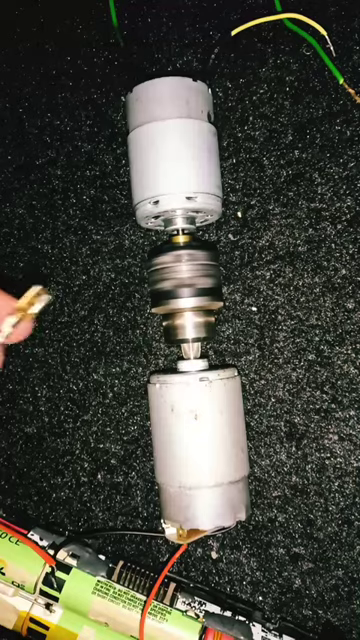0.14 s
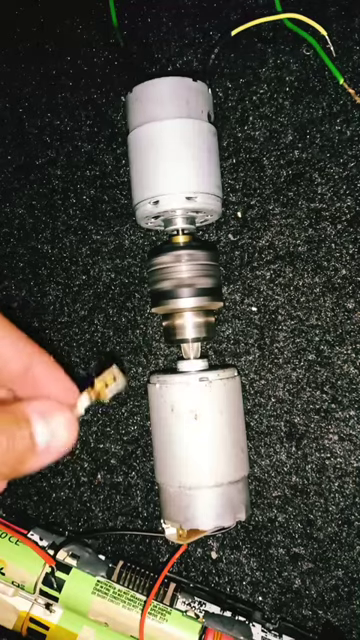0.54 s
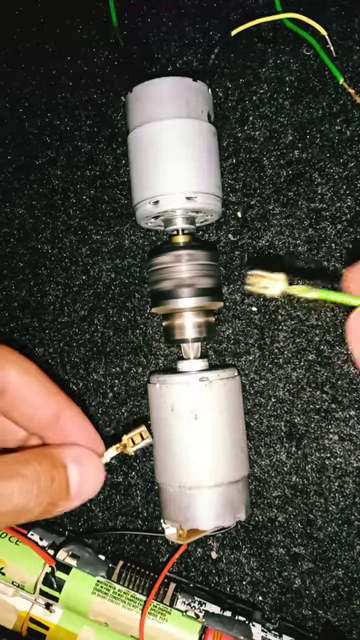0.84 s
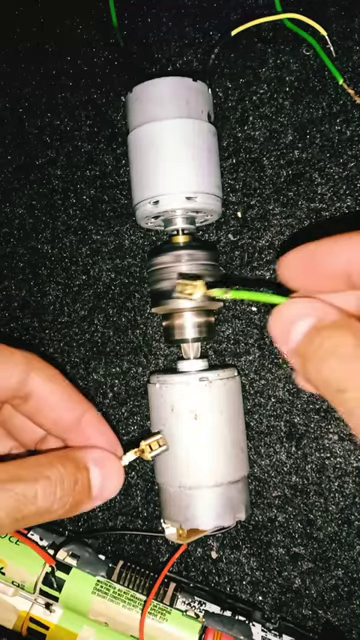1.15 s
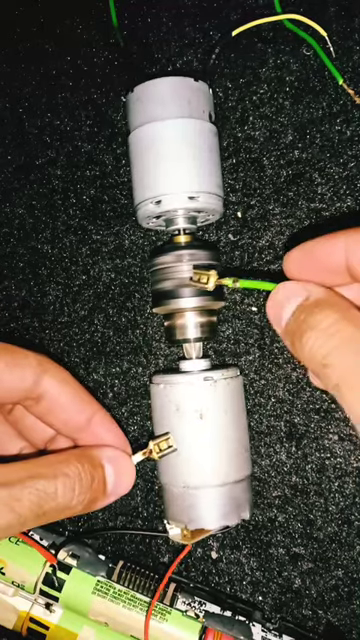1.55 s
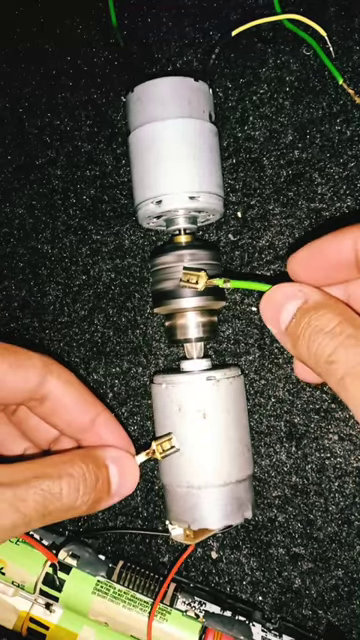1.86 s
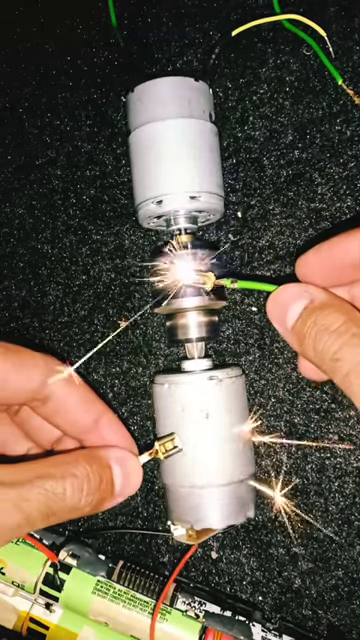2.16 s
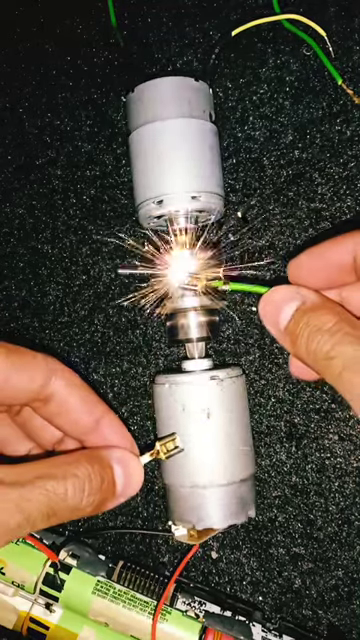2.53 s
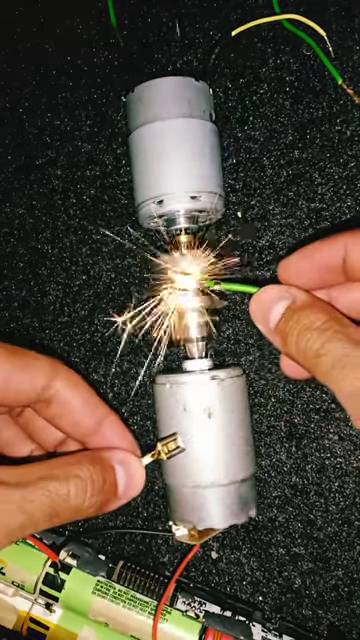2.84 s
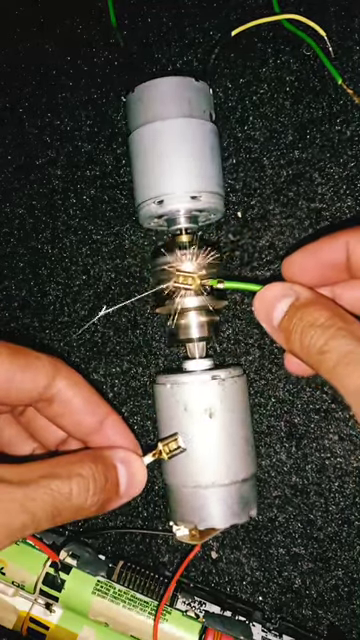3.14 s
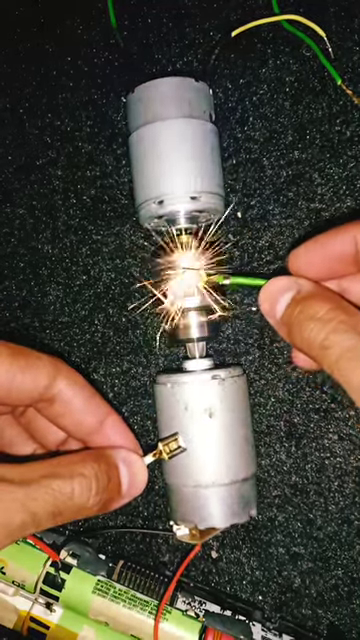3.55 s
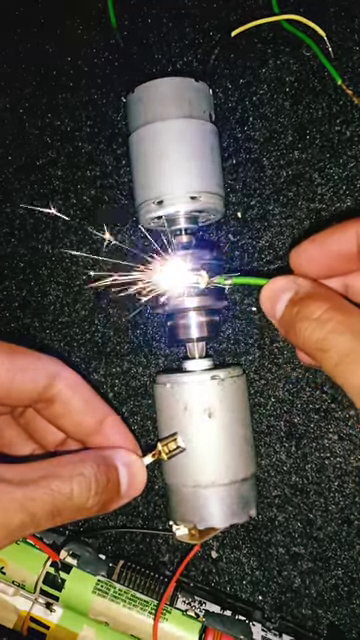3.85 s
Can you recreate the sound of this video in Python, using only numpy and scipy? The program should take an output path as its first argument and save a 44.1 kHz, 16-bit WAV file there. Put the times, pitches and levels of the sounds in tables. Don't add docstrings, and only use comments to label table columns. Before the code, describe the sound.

Electric sparking snaps and sizzles in rough buzzing bursts after quiet hiss and small handling knocks

```python
import sys
import numpy as np
from scipy import signal
from scipy.fft import rfft, irfft
from scipy.io import wavfile
from scipy.ndimage import uniform_filter1d

SR = 44100
rng = np.random.default_rng(int(sys.argv[2]) if len(sys.argv) > 2 else 0)


def file_out(sig):
    cols = np.atleast_2d(sig).T
    lim = np.clip(cols, -1, 1)
    pcm = np.round(lim * 32767).astype(np.int16)
    wavfile.write(sys.argv[1], SR, pcm)


def gain_from_db(level_db):
    decades = np.asarray(level_db, float) / 20
    return 10 ** decades


N = 176400
T = np.arange(N) / SR


def evened(x):
    return x / np.sqrt(np.mean(x ** 2) + 1e-20)


def curve(table, column):
    rows = np.array(table)
    return np.interp(T, rows[:, 0], rows[:, column])


def mode(x, hz, width):
    return signal.lfilter(*signal.iirpeak(min(hz, SR / 2.2), hz / width, SR), x)


def double_mode(x, hz, width):
    return mode(mode(x, hz, width), hz, width)


def glide(x, hz, width):
    turn = np.exp(2j * np.pi * np.cumsum(hz) / SR)
    r = np.exp(-np.pi * width / SR)
    return 2 * (turn * signal.lfilter([(1 - r) ** 2], [1, -2 * r, r * r], x / turn)).real


def clicks(per_s, spread_db):
    sizes = gain_from_db(spread_db * np.minimum(rng.exponential(1, N), 3))
    return (rng.random(N) < per_s / SR) * sizes


def wobble(size):
    return evened(uniform_filter1d(uniform_filter1d(rng.standard_normal(N), size), size))


# t/s, brush tick rate/Hz, level/dB
MOTOR = [(.1, 117, -67), (.5, 108, -64), (.75, 119, -67), (1.0, 111, -68.5), (1.5, 122.8, -68.5),
         (2.1, 119, -71.5), (4, 190, -74)]
# f/Hz, level/dB
HISS_SPECTRUM = [(30, -6), (90, 3.5), (300, 0.5), (1200, -5), (3300, -3), (4400, -11), (6200, -28),
                 (7900, -16), (11000, -27.5), (13600, -23.5), (15500, -48)]
# f/Hz, width/Hz, level/dB at the whine's peak, slope/(dB/s) away from it
BRUSH_RING = [(12800, 300, -86, -1), (13500, 400, -89, -2), (4900, 250, -91, 2)]
TICK_LEVELS = [0, -1, -3, -6, -4]
# order, level/dB
TICK_ORDERS = [(1, -77), (2, -76)]
# t/s, f/Hz, level/dB
BRUSH_WHINE = [(.1, 5140, -84), (.26, 5300, -79), (.4, 5320, -87), (.68, 5300, -73.5), (.8, 5280, -76),
               (.92, 5300, -91), (1.2, 5300, -100)]


def idle():
    hz = np.fft.rfftfreq(N, 1 / SR)
    f, db = np.transpose(HISS_SPECTRUM)
    colour = gain_from_db(np.interp(np.log(hz + 1), np.log(f), db))
    hiss = irfft(rfft(rng.standard_normal(N)) * colour, N)
    hiss /= np.std(mode(hiss, 1520, 6000))
    hiss_db = curve(MOTOR, column=2) + wobble(size=2000)

    turns = np.cumsum(curve(MOTOR, column=1)) / SR
    decay = np.exp(-(turns % 1) / 0.059)
    strength = gain_from_db(TICK_LEVELS)[turns.astype(int) % len(TICK_LEVELS)]
    ticks = decay * strength * rng.standard_normal(N)

    away_s = abs(T - .68)
    brushes = sum(evened(double_mode(ticks, f, width)) * gain_from_db(db + slope * away_s)
                  for f, width, db, slope in BRUSH_RING)
    whine = evened(glide(ticks, curve(BRUSH_WHINE, column=1), 120)) * gain_from_db(curve(BRUSH_WHINE, column=2))
    orders = sum(gain_from_db(db) * np.sin(2 * np.pi * k * turns) for k, db in TICK_ORDERS)
    return hiss * gain_from_db(hiss_db) + brushes + whine + orders


# t/s, level/dB
HUM_SWELL = [(.1, -65.5), (.4, -73), (.6, -50), (.68, -46), (.84, -46.5), (.97, -59.5), (1.09, -48.5),
             (1.23, -48.5), (1.48, -77.5), (1.58, -55), (1.74, -58.5), (1.84, -64), (1.94, -56.5),
             (2.33, -60.5), (2.6, -51.5), (2.8, -81), (3.08, -61), (4, -73)]


def hum():
    tone = np.sqrt(2) * np.sin(2 * np.pi * 59 * T)
    fuzz = evened(mode(mode(rng.standard_normal(N), 67, 110), 48, 130))
    return gain_from_db(curve(HUM_SWELL, column=1)) * (tone + gain_from_db(-15) * fuzz)


# t/s, length/s, level/dB, f/Hz
HANDLING_KNOCKS = [
    (.318, .011, -43, 3150),
    (.3175, .004, -45, 1300),
    (.342, .004, -47, 2800),
    (.343, .004, -47, 1600),
    (.379, .005, -36, 1550),
    (.379, .003, -49, 4300),
    (.322, .003, -59, 7000),
    (.38, .004, -59, 7900),
    (1.262, .008, -60, 1500),
    (2.1, .008, -62, 1500),
]
# t/s, length/s, level/dB
SLEEVE_RUSTLES = [
    (0.218, 0.33, -58),
    (0.6, 0.14, -57.5),
]
# f/Hz, width/Hz, level/dB
CLOTH_RING = [(1140, 580, -2), (1630, 220, 3.5), (2140, 180, -3), (2830, 260, -5.5), (3850, 180, -2),
              (2380, 1700, -10), (7450, 2700, -20.5)]
# t/s, pitch ratio
CLOTH_BEND = [(.18, 0.82), (.28, 0.98), (.4, 1.13), (.52, 0.915), (.62, .96), (.68, 0.97), (.75, 1)]


def handling():
    knock_noise, cloth_noise = rng.standard_normal((2, N))
    knocks = 0
    for s, length, db, hz in HANDLING_KNOCKS:
        burst = knock_noise * (T > s) * np.exp(-((T - s) / length) ** 2)
        knocks = knocks + gain_from_db(db) * 5 * double_mode(burst, hz, 0.35 * hz)
    arch = sum(gain_from_db(db) * np.sin(np.pi * np.clip((T - s) / length, 0, 1)) for s, length, db in SLEEVE_RUSTLES)
    bend = curve(CLOTH_BEND, column=1)
    cloth = evened(sum(gain_from_db(db) * glide(cloth_noise, hz * bend, width) for hz, width, db in CLOTH_RING))
    return knocks + arch * cloth


# f/Hz, width/Hz, level/dB
SPARK_MODES = [(1063, 2250, -6.5), (2350, 550, -3.5), (3260, 640, 4), (3960, 1950, -1.5), (4853, 590, -1.5),
               (7226, 850, -4.5), (9200, 2000, -16), (10320, 1600, -14), (11930, 2800, -5.5),
               (13330, 2360, 0)]


def click_shape():
    hz = abs(np.fft.fftfreq(4096, 1 / SR))
    power = sum(gain_from_db(2 * db) / (1 + (2 * (hz - f) / width) ** 2) ** 2 for f, width, db in SPARK_MODES)
    log_level = np.log(power * (hz / (hz + 300)) ** 3 + 1e-9) / 2
    spectrum = np.exp(np.conj(signal.hilbert(log_level)))
    shape = -np.fft.ifft(spectrum).real[:1024]
    return shape / abs(shape).max()


def spark_colour(drive):
    bench_t60_s, port_lag_s, port_hz, port_width_hz = 0.045, 0.0023, 7956, 870
    t = np.arange(2000) / SR
    scatter = rng.standard_normal(2000) * gain_from_db(-60 * t / bench_t60_s) * (t > 0)
    echo = signal.oaconvolve(drive, scatter / np.linalg.norm(scatter))[:len(drive)]
    blunt = uniform_filter1d(drive, size=3)
    late = np.roll(drive + echo / 2, int(port_lag_s * SR))
    port = double_mode(late, port_hz, port_width_hz)
    direct = signal.oaconvolve(blunt + gain_from_db(-10) * echo, click_shape())[:len(drive)]
    heard = direct + 20 * gain_from_db(-15.5) * port
    return heard - mode(heard, 6340, 160)


# t/s, small spark level/dB, scrape pressure level/dB
CHUCK_CONTACT = [(2.2, -55, -91), (2.24, -60, -79), (2.3, -31.5, -49.5), (2.44, -34, -50.5),
                 (2.47, -40.5, -55), (2.52, -41.5, -58), (2.57, -37, -44), (2.69, -35.5, -44.5),
                 (2.79, -36.5, -41.5), (2.82, -34, -44.5), (2.88, -39, -49.5), (2.94, -44, -42.5),
                 (2.97, -38.5, -43.5), (3.2, -39, -42), (3.3, -38, -44), (3.57, -35, -43),
                 (3.65, -31, -42.5), (3.7, -36, -42.5), (4, -23.5, -43)]


def small_sparks():
    break_hz, window, clicks_per_s, stray = 100.1, .19, 1500, 0.025
    breaks = break_hz * T + .02
    size = gain_from_db(2 * rng.standard_normal(500))[breaks.astype(int)]
    gate = np.exp(-((breaks % 1 - window) / (0.69 * window)) ** 2) * size
    per_s = clicks_per_s * (stray + np.minimum(gate, 2)) / 2
    sharp = clicks(per_s, 1.5)
    dull = uniform_filter1d(clicks(per_s, 1.5), size=3)
    sizzle = gain_from_db(-5) * (0.86 + gate) * rng.standard_normal(N)
    drive = evened(sharp + 2 * dull) + sizzle
    level_db = curve(CHUCK_CONTACT, column=1) - 7
    return evened(spark_colour(drive)) * gain_from_db(level_db) * (T > CHUCK_CONTACT[0][0])


# f/Hz, width/Hz, level/dB
CHUCK_RING = [(801, 530, 6.5), (717, 114, 1.5), (865, 81, 2), (949, 172, 3.5), (1101, 280, 2),
              (2158, 360, 3.5), (1500, 790, -9), (2760, 190, -40)]
# t/s, pitch ratio
CHUCK_DRIFT = [(2.2, 1.106), (2.9, 1.03), (3.13, 1.08), (3.4, 1.07), (3.7, 1.1), (4, 1.16)]


def scrape():
    slips = clicks(2500, 2.76) * rng.standard_normal(N)
    drift = curve(CHUCK_DRIFT, column=1)
    body = 0
    for hz, width, db in CHUCK_RING:
        pitch = hz * drift ** (hz < 1300)
        body = body + gain_from_db(db) * glide(slips, pitch, width)
    body = evened(signal.sosfilt(signal.butter(6, 520, "high", fs=SR, output="sos"), body))
    squeal = evened(double_mode(slips, 9940, 300)) * (T < 2.86)
    level_db = curve(CHUCK_CONTACT, column=2) + 0.5
    return (body + gain_from_db(-16) * squeal) * gain_from_db(level_db) * (T > CHUCK_CONTACT[0][0])


# t/s, peak level/dB
STRONG_SPARKS = [(2.2194, -19.5), (2.2283, -16), (2.2502, -21.5), (2.2588, -22), (2.2783, -21), (2.287, -23),
                 (2.3008, -22), (2.3081, -13.5), (2.3193, -36), (2.3277, -20), (2.3371, -24), (2.3404, -23),
                 (2.3502, -24), (2.3585, -16), (2.3684, -31), (2.3782, -29), (2.388, -21), (2.3972, -27),
                 (2.4105, -17), (2.4301, -23), (2.4367, -32), (2.4406, -23), (2.4466, -22.5), (2.4798, -26),
                 (2.4878, -21.5), (2.5005, -24.5), (2.5371, -20.5), (2.54, -26), (2.5601, -14.5),
                 (2.5682, -14.5), (2.5804, -20), (2.589, -23), (2.599, -21), (2.6082, -26), (2.6192, -19),
                 (2.6276, -21), (2.6389, -17.5), (2.6497, -24), (2.6596, -17.5), (2.6684, -22),
                 (2.678, -20.5), (2.686, -20.5), (2.6993, -22.5), (2.7059, -10.5), (2.7098, -20),
                 (2.7508, -25), (2.7604, -21), (2.8052, -15), (2.8089, -16), (2.8294, -12.5), (2.8488, -23),
                 (2.8596, -19), (2.8879, -31), (2.8968, -21), (2.9169, -16.5), (2.921, -34), (2.9276, -31),
                 (2.9302, -15),
                 (2.9792, -26), (2.9862, -31), (3.0191, -33), (3.0292, -23.5), (3.0382, -29), (3.0587, -20),
                 (3.0662, -25.5), (3.0779, -26), (3.0994, -21), (3.1064, -32), (3.109, -36), (3.1179, -24),
                 (3.1589, -22), (3.1876, -15), (3.1994, -26.5), (3.2485, -25.5), (3.2792, -24.5),
                 (3.3349, -26), (3.3591, -25), (3.3747, -21.5), (3.3781, -31), (3.4183, -25), (3.4451, -28),
                 (3.4476, -30), (3.4567, -28), (3.4595, -31.5), (3.479, -26.5), (3.4861, -24),
                 (3.4987, -23.5), (3.5073, -30), (3.5293, -29), (3.5378, -26),
                 (3.5785, -23.5), (3.5976, -18.5), (3.6087, -20), (3.6161, -23), (3.6191, -21), (3.6284, -25),
               (3.6384, -22.5), (3.6641, -27), (3.6685, -21), (3.6772, -17.5), (3.6858, -24), (3.6888, -20),
               (3.6959, -19), (3.6988, -17.5), (3.706, -10.5), (3.7094, -18), (3.715, -19), (3.7183, -13.5),
               (3.7351, -22), (3.7384, -14), (3.7459, -22), (3.7565, -12.5), (3.7786, -13), (3.7855, -22),
               (3.7974, -15.5), (3.8161, -15.5), (3.8267, -26), (3.8294, -26), (3.837, -13.5),
               (3.8587, -25), (3.866, -14.5), (3.8762, -15), (3.888, -28), (3.8993, -17.5), (3.9051, -15.5),
               (3.9081, -20), (3.9155, -16), (3.9289, -22), (3.9348, -16.5), (3.9385, -9.5),
               (3.9454, -12.5), (3.9494, -26), (3.9557, -12), (3.9589, -12), (3.9661, -21), (3.9746, -16),
               (3.9777, -14), (3.9846, -11.5), (3.9876, -11), (3.9961, -23)]
# t/s, level/dB
AIR_PUSHES = [(2.2286, -38.5), (2.312, -36.5), (2.5592, -39.5), (2.5696, -54), (2.6395, -40), (2.669, -50),
              (2.6785, -44), (2.7309, -37), (2.741, -44), (2.7606, -40), (2.779, -38), (2.8109, -28),
              (2.8195, -39), (2.83, -26), (2.8615, -34), (2.9171, -30), (2.9305, -30.5), (3.579, -34.5),
              (3.598, -32), (3.6097, -50), (3.6635, -42), (3.708, -47), (3.7578, -35), (3.8162, -42),
              (3.837, -54), (3.8776, -43), (3.9585, -37), (3.9793, -42), (3.99, -32)]


def strong_sparks():
    restrike_s, restrike_db, sputter_t60_s, sputter_db = .0012, -17.5, 0.0096, -5
    drive, push = np.zeros(N + 999), np.zeros(N + 999)
    rows = STRONG_SPARKS
    t = np.arange(400) / SR
    chances = rng.random((len(rows), 2))
    noises = rng.standard_normal((len(rows), 400))
    for (s, db), chance, noise in zip(rows, chances, noises):
        at = round((s - .0001) * SR)
        again = at + int((.3 + chance[0]) * restrike_s * SR)
        drive[at] += gain_from_db(db)
        drive[again] += gain_from_db(db + restrike_db * (.5 + chance[1]))
        drive[at:at + 400] += gain_from_db(db + sputter_db - 60 * t / sputter_t60_s) * noise / 5
    for s, db in AIR_PUSHES:
        push[round((s - .001) * SR)] += gain_from_db(db)
    unit_peak = abs(mode(np.eye(1, 99)[0], 200, 340)).max()
    low = mode(push, 200, 350) / unit_peak
    return (gain_from_db(4) * spark_colour(drive) + gain_from_db(5.5) * low)[:N]


def pop():
    fall_s, cut_hz, cut_q = 0.0023, 94, 1
    t = T - 2.7059
    dip = 0.52 * np.exp(-((t + 0.00004) / .00007) ** 2)
    step = (t > 0) * np.exp(-abs(t) / fall_s) - dip
    w = 2 * np.pi * cut_hz
    bass_cut = signal.bilinear([1, 0, 0], [1, w / cut_q, w * w], SR)
    return gain_from_db(-7) * signal.lfilter(*bass_cut, uniform_filter1d(step, size=5))


def scene():
    motors = idle() + hum() + handling()
    contact = small_sparks() + scrape() + strong_sparks() + pop()
    return (motors + contact)[None]


def top_cut(x):
    return signal.sosfilt(signal.butter(12, 15690, fs=SR, output="sos"), x)


def record(dry):
    duck_from_db, recover_db_per_s, duck_share = -29.5, 237, .55
    fall = recover_db_per_s * T
    power_db = 10 * np.log10(abs(uniform_filter1d(dry[0] ** 2, size=100, origin=49)) + 1e-12)
    peak_db = np.maximum.accumulate(power_db + fall) - fall
    over_db = np.maximum(peak_db - duck_from_db, 0)
    late_db = signal.lfilter([.004], [1, -.996], over_db)
    ducked = dry / gain_from_db(duck_share * late_db)
    soft = signal.lfilter(*signal.butter(12, 14200, fs=SR), ducked)
    started = soft * (T > .1053)
    limited = signal.oaconvolve(started, signal.firwin(255, 15600, fs=SR)[None], "same")
    return top_cut(limited)


dry = scene()
out = record(dry)
file_out(out)
```